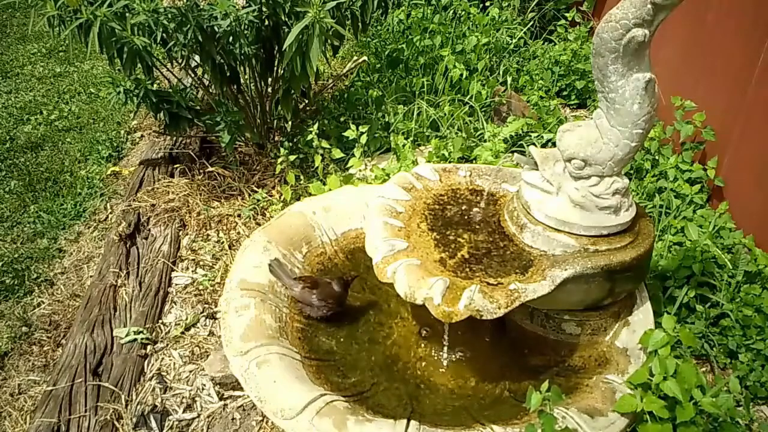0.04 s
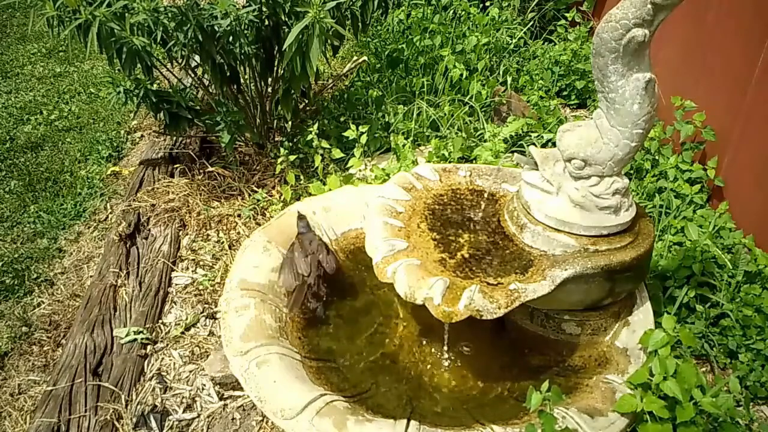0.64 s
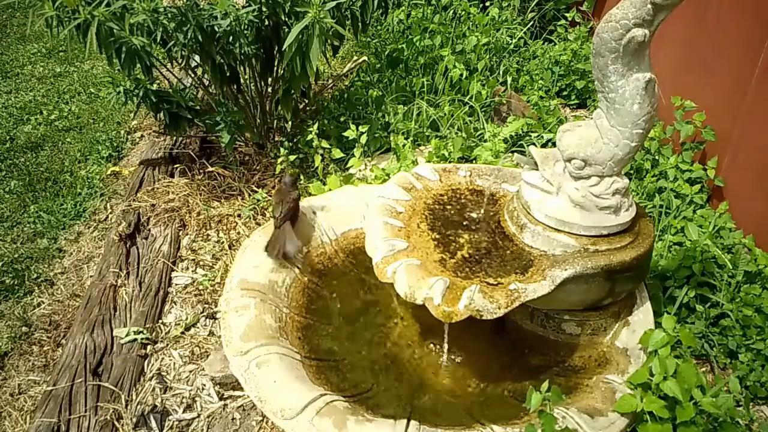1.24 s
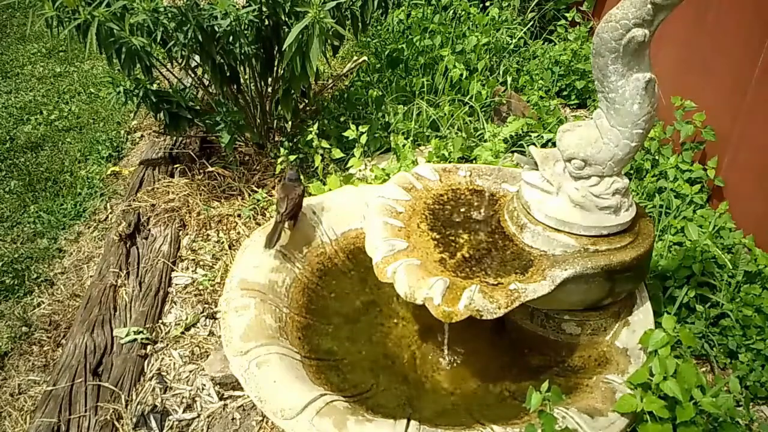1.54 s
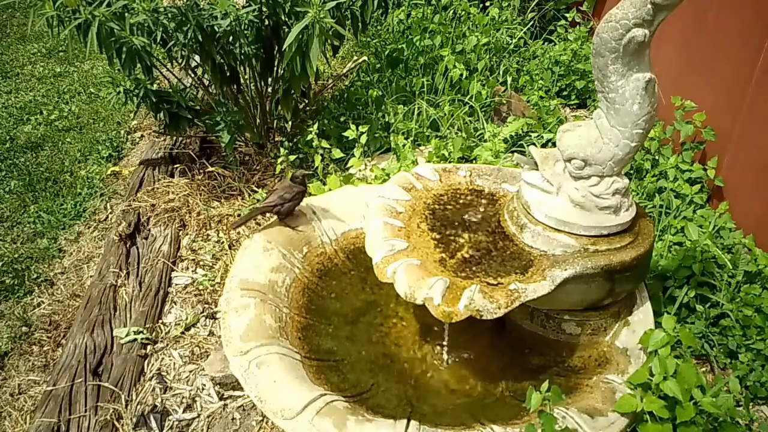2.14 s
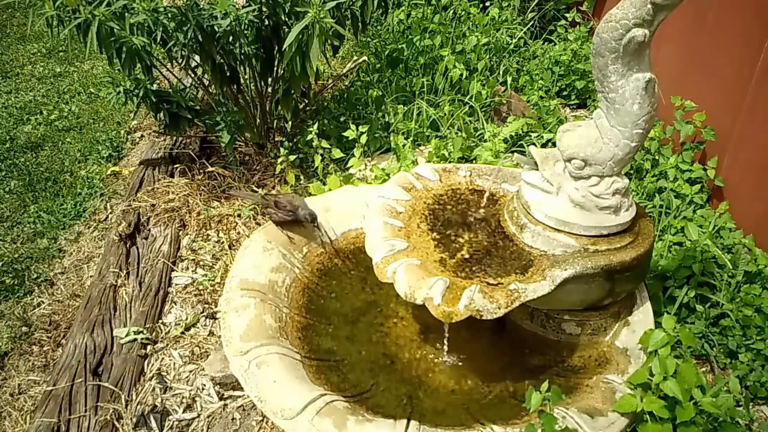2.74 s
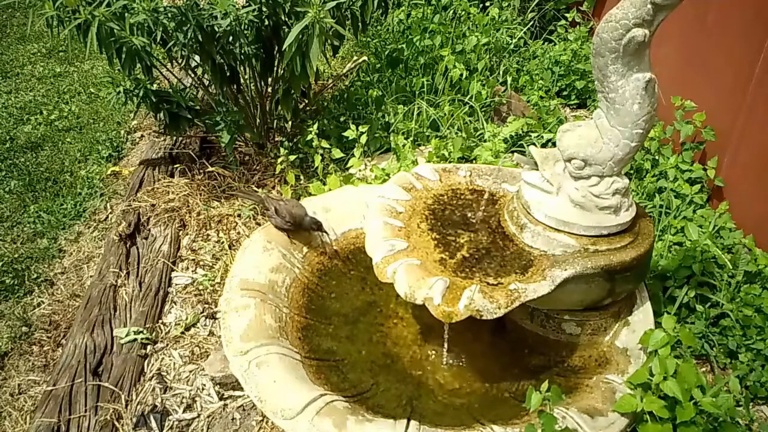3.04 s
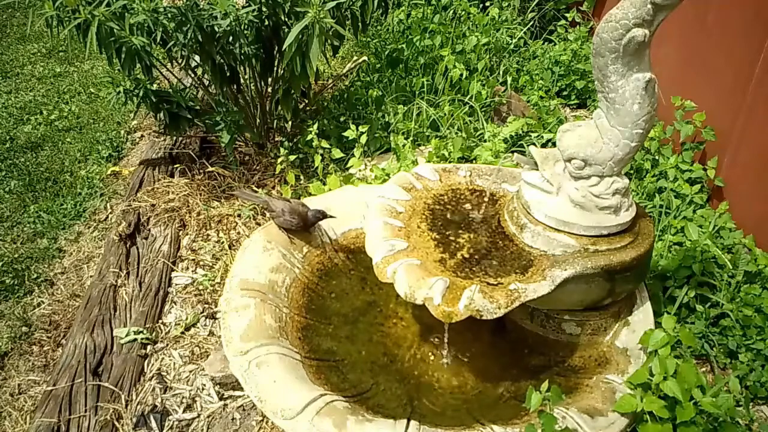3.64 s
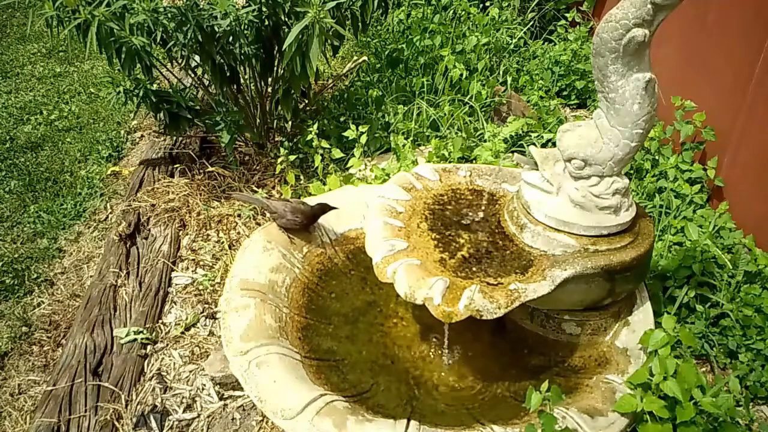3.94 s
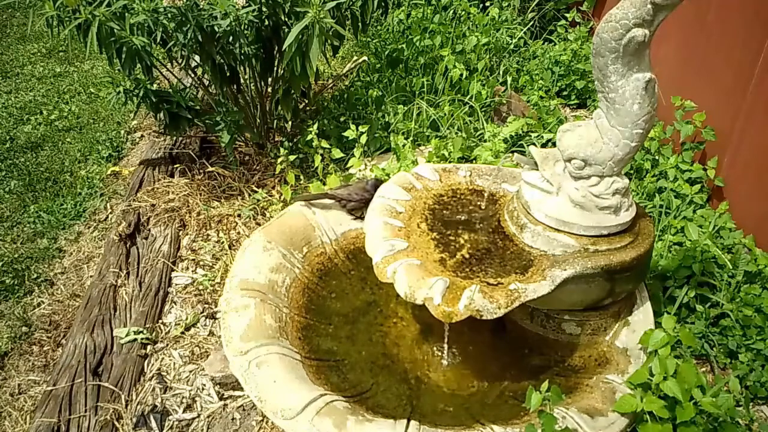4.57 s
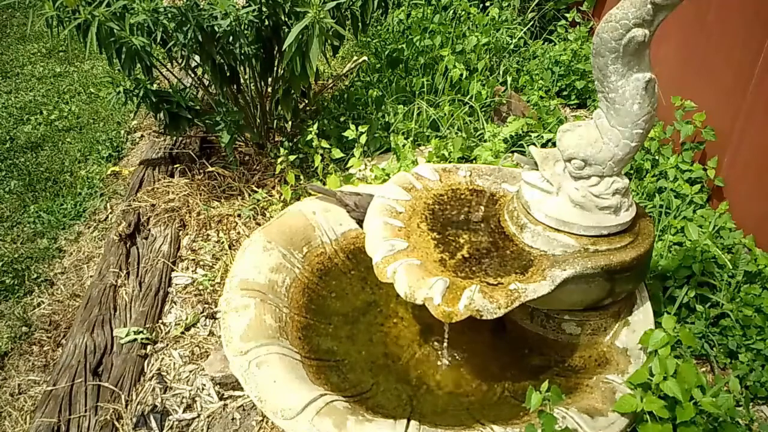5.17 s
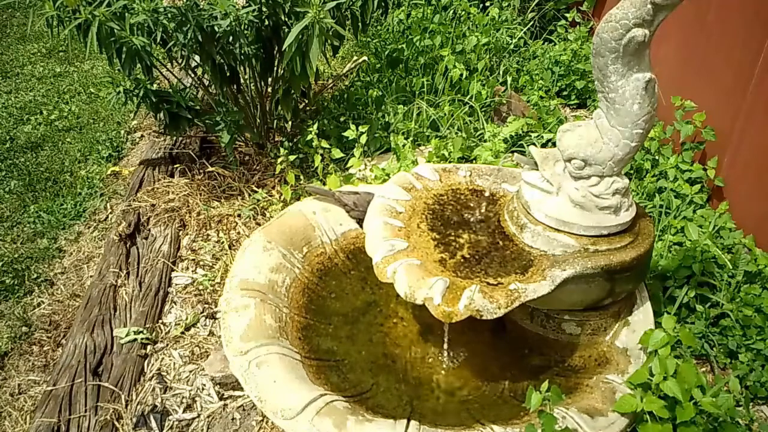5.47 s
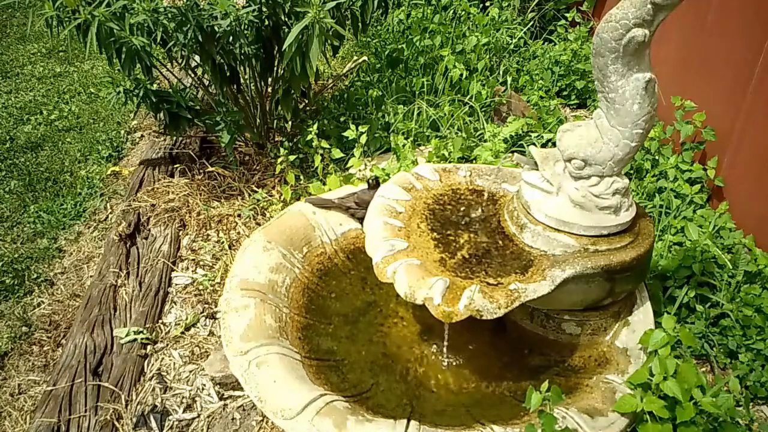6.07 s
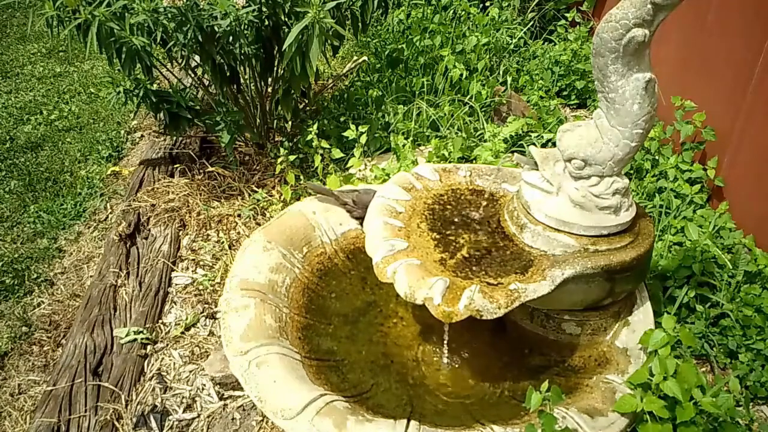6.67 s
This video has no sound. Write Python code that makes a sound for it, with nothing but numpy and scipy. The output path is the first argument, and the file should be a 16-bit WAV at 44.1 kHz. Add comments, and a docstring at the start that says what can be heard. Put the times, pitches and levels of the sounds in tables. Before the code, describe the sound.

Close water splashing and plinking steadily in a concrete fountain, joined midway by a distant songbird and then a nearer bird's rising whistles.

```python
"""A thin stream trickles from a concrete garden fountain's scalloped bowl into the shallow basin below.
Close to the microphone, drops slap the water and trap bubbles that ring and rise in pitch; fine spray
ticks on the concrete, and the hollow under the bowl rings along. A pump hums beneath it all.
Far off in the garden one songbird sings a run of falling slurs, then a nearer one gives long rising
whistles. Trees and walls return a soft echo; the microphone is mono."""
import sys
import numpy as np
from scipy import signal
from scipy.fft import rfft, irfft, next_fast_len
from scipy.io import wavfile
from scipy.ndimage import map_coordinates

SR = 44100
rng = np.random.default_rng(int(sys.argv[2]) if len(sys.argv) > 2 else 0)


def waveform_to_disk(signal):
    """Save audio, clipped to [-1, 1], as 16-bit WAV at the path in sys.argv[1]."""
    frames = np.transpose(np.atleast_2d(signal))
    scaled = np.clip(frames, -1, 1) * 32767
    samples = np.round(scaled).astype(np.int16)
    wavfile.write(sys.argv[1], SR, samples)


N = 300321

# Levels in the tables are relative: each layer's gain and colour come on top.
# hush of still air and distance: freq_hz, gain_db
HUSH_COLOUR = [(20, -10), (60, -4), (140, -1), (300, 1.5), (500, 6.5), (1000, -8), (3000, -45),
               (7000, -15.5), (11000, -17), (16000, -20)]
# echo among the trees and walls: freq_hz, t60_s
GARDEN_DECAY = [(500, 0.76), (3000, 0.58), (8000, 0.75)]
# puffs of air on the microphone: centre_s, level_db
AIR_PUFFS = [(0.46, -76), (1.55, -72)]
# their rumble: freq_hz, gain_db
PUFF_COLOUR = [(10, -20), (30, 5), (65, -3), (130, -25), (600, -80)]
# tones of the pump: pitch_hz, level_db
PUMP_TONES = [(58, -85), (104.9, -79.5), (118, -85.5), (209, -88), (412.3, -83.5)]
# slow swell of the hum, taken about its mean: time_s, level_db
HUM_SWELL = [(0.0, -83), (0.07, -84), (1.06, -77.5), (3.41, -86), (4.72, -79.5), (6.81, -81.5)]
# the far bird's closing flourish: start_s, length_s, first_hz, last_hz, level_db
FLOURISH = [(3.867, 0.078, 2837, 4135, -43), (3.917, 0.037, 5120, 4070, -45.5),
            (3.993, 0.094, 3004, 4040, -48), (4.131, 0.075, 3970, 3140, -51.5),
            (4.241, 0.063, 3590, 3190, -46)]
# the near bird's rising whistles: start_s, length_s, level_db
RISING_WHISTLES = [(4.703, 0.34, -45.5), (5.694, 0.38, -39)]
# one such whistle climbs, swells and sinks back a little: length_share, pitch_hz, level_db
RISING_CONTOUR = [(0, 1604, -12), (.27, 1880, -11), (.48, 2240, -4), (.57, 2750, -4), (.64, 3080, 2),
                  (.72, 3170, 5.5), (.79, 3090, -4), (.88, 2760, -6), (1, 2590, -7)]
# the near bird's soft notes: start_s, length_s, first_hz, middle_hz, last_hz, level_db
SOFT_NOTES = [(5.29, 0.12, 2980, 2590, 2620, -49), (5.465, 0.16, 2590, 2655, 2730, -52),
              (6.049, 0.203, 2670, 2580, 2670, -55), (6.318, 0.095, 2620, 2240, 1950, -47),
              (6.51, 0.078, 1780, 1753, 1660, -52), (6.607, 0.086, 2170, 2136, 2360, -52)]
# colour of the bowl and basin: freq_hz, gain_db
BASIN_COLOUR = [(100, -17), (400, -3.5), (650, -2), (950, 1.5), (1200, -2), (1450, 2), (2500, 3), (3400, 6),
                (4400, 9.5), (5400, 2), (6700, 9), (7600, 5), (9800, 3.5), (11200, -6.5), (16000, -60)]
# the loudest spray landing on concrete: start_s, level_db
SPRAY_TICKS = [(0.1546, -37), (0.627, -34), (0.7874, -33.5), (0.9068, -34), (0.959, -34), (0.985, -35),
               (1.053, -28), (1.1797, -49), (1.3015, -36), (1.4167, -34), (1.4752, -33), (1.5252, -36.5),
               (1.758, -26.5), (1.9604, -35.5), (2.1772, -37), (1.9849, -36), (2.1337, -36), (2.294, -33),
               (2.8374, -32), (3.3576, -34), (3.4301, -36), (3.5126, -36), (3.5242, -39), (3.7264, -35),
               (3.9225, -37), (4.1721, -33), (4.8272, -31), (5.0142, -33.5), (5.574, -32.5),
               (5.6825, -36.5), (5.7486, -33), (5.9202, -35.5), (5.982, -37), (6.1963, -35.5),
               (6.2496, -35.5), (6.316, -34), (6.3274, -40), (6.547, -31.5), (6.7424, -41)]
# moments when the stream breaks off: centre_s
STREAM_LULLS = [0.611, 1.3, 1.728, 1.795, 1.898, 2.69, 2.726, 2.825, 3.969, 4.547, 4.645, 5.055, 5.12, 5.22,
                5.499, 5.7, 5.74, 5.775, 6.03, 6.285]
# fizz where the stream lands: freq_hz, gain_db
FIZZ_COLOUR = [(400, -4), (650, -34), (900, 14), (1500, 15), (2500, 6), (3500, 11.5), (4400, 0.5),
               (5500, 1.5), (6700, -15.5), (10000, -10), (11500, -36)]
# bubbles that float up and swoop: start_s, length_s, first_hz, last_hz, level_db
FLOATING_BUBBLES = [(0.395, 0.017, 1490, 2920, -45), (1.37, 0.025, 922, 2910, -39),
                    (1.62, 0.018, 1390, 2620, -44), (1.919, .028, 990, 1900, -41),
                    (2.108, 0.032, 905, 1710, -47.5), (2.115, 0.016, 2450, 4120, -43),
                    (2.225, 0.057, 533, 1110, -45), (2.731, .03, 647, 1000, -53),
                    (3.137, 0.05, 550, 844, -51.5), (3.262, .027, 570, 950, -64),
                    (3.292, 0.022, 1010, 1750, -40), (3.71, 0.044, 587, 1250, -44),
                    (4.041, 0.021, 864, 2100, -45.5), (4.691, .02, 1900, 3270, -45),
                    (5.174, 0.024, 1290, 2620, -50), (6.052, 0.014, 1350, 3020, -43.5),
                    (6.3, .009, 2600, 3970, -43), (6.436, 0.017, 1440, 2950, -40),
                    (6.508, 0.021, 1325, 3430, -46), (6.612, 0.019, 580, 950, -44.5)]
# sharp smacks of drops hitting the water: start_s, level_db, centre_hz
SPLAT_DROPS = [(0.029, -38, 3600), (0.113, -33, 1400), (0.624, -32, 1750), (0.726, -29.5, 2640),
               (0.987, -31.5, 1440), (1.053, -30, 3500), (1.178, -33, 1630), (1.217, -29, 2370),
               (1.271, -29, 2570), (1.68, -36, 1980), (1.744, -29.5, 2200), (2.376, -33, 3460),
               (2.612, -32.5, 3230), (2.838, -31, 3360), (2.853, -25, 1920), (2.937, -33, 3350),
               (3.012, -33, 1450), (3.061, -33.5, 3580), (3.162, -32, 3060), (3.521, -42, 1460),
               (3.523, -31.5, 4050), (3.619, -34, 3500), (4.598, -29, 1510), (4.613, -29, 1320),
               (4.87, -30, 1500), (4.934, -32.5, 3480), (5.072, -29.5, 1630), (5.15, -31.5, 2040),
               (5.552, -29, 2700), (5.652, -29, 2030), (5.797, -35, 1440), (6.249, -51, 3320),
               (6.419, -32, 3600), (6.509, -34, 1440), (6.696, -21.5, 2780), (6.739, -37, 1500)]
# big bubbles glide most: pitch_hz, rise_share_per_life
BUBBLE_GLIDE = [(600, 0.182), (1500, 0.094), (3500, 0.07)]
# heavy drops, with low bubbles, slap hardest: pitch_hz, boost_db
SLAP_BOOST = [(800, 9), (1400, 0)]
# the loudest drops that trap a bubble: start_s, level_db, pitch_hz, life_cycles
RINGING_DROPS = [(0.029, -19.5, 1920, 1.9), (0.063, -36, 1980, 6.3), (0.132, -34, 1280, 4.4),
                 (0.141, -36.5, 607, 4.3), (0.184, -37, 563, 6.6), (0.214, -25, 1390, 2.1),
                 (0.224, -26.5, 1390, 5.3), (0.279, -38, 640, 4.8), (0.291, -25.5, 2630, 4.7),
                 (0.311, -23, 3400, 1.3), (0.313, -27.5, 2050, 3.5), (0.372, -32, 1540, 6.2),
                 (0.379, -21.5, 1940.0, 1.2), (0.414, -30, 1390, 1.8), (0.434, -33.5, 690, 7.3),
                 (0.447, -27, 1496, 5.6), (0.464, -19, 3100, 0.91), (0.516, -34, 694, 1.9),
                 (0.547, -37.5, 600, 7.7), (0.587, -37.5, 944, 8.8), (0.624, -33, 690, 3),
                 (0.65, -34.5, 610, 5.9), (0.669, -23, 2210, 1.9), (0.686, -31, 1390, 2),
                 (0.751, -34.5, 3380, 6.1), (0.787, -31, 2650, 5.7), (0.826, -33, 3030, 4.7),
                 (0.857, -35.5, 1550, 5.1), (0.875, -36, 3700, 5), (0.963, -24.5, 1450, 5.7),
                 (1.02, -35, 3220, 8.1), (1.077, -28.5, 3310, 6.7), (1.092, -37, 550, 4.1),
                 (1.092, -22.5, 1810, 1.1), (1.115, -35, 4300, 4.2), (1.144, -26.5, 1310, 3.9),
                 (1.146, -36, 615, 1.6), (1.245, -33, 1010, 6.6), (1.245, -22.5, 3400, 1.1),
                 (1.347, -24.5, 4180.0, 2.2), (1.365, -30, 920, 4.9), (1.368, -41, 540, 4.4),
                 (1.48, -38, 706, 3.4), (1.51, -23.5, 3200, 1.9), (1.523, -30, 2170, 3.2),
                 (1.659, -36, 1330, 4), (1.68, -25, 1490, 2.7), (1.688, -37, 677, 6.9),
                 (1.743, -40.0, 785, 5.2), (1.744, -24.5, 3600, 1.8), (1.751, -31, 1310, 3.5),
                 (1.755, -38, 462, 2.5), (1.803, -33.5, 3950, 10), (1.842, -27.5, 1390, 2.8),
                 (1.845, -36, 3530, 5.3), (1.881, -34.5, 3400, 5.6), (1.911, -28, 700, 4.6),
                 (1.926, -26.5, 1390, 1.4), (1.961, -27.5, 2050, 2.5), (1.985, -31.5, 613, 1.2),
                 (2.035, -35.5, 2590, 7), (2.08, -41, 630, 3.9), (2.091, -34, 2440, 5.3),
                 (2.228, -34.5, 522.0, 2.6), (2.278, -39, 566, 4.2), (2.279, -27.5, 1300, 1.6),
                 (2.293, -28, 3220, 6.6), (2.307, -32.5, 586, 4.6), (2.324, -25.5, 1615, 3.6),
                 (2.333, -54, 598, 4.8), (2.337, -25, 2050, 3.2), (2.388, -30, 1690, 3.1),
                 (2.456, -33, 1337, 2.6), (2.473, -29, 2390, 3.1), (2.519, -29, 1290, 5.9),
                 (2.55, -32.5, 924, 12), (2.582, -32.5, 935, 6.3), (2.593, -32, 2250, 4.1),
                 (2.622, -31.5, 3250, 11), (2.736, -29, 3450, 6.4), (2.747, -34.5, 1290, 5.3),
                 (2.765, -30.5, 1460, 2.4), (2.838, -27, 1930, 1.9), (2.856, -23.5, 854, 2),
                 (2.879, -35, 1320, 2.6), (2.951, -23.5, 3380, 1.9), (2.952, -29.5, 1540, 3.0),
                 (2.969, -31.5, 3780, 4.8), (2.987, -33, 1150, 3.9), (3.012, -31, 1560, 5.5),
                 (3.022, -24.5, 1350, 4.8), (3.027, -37, 647, 2.2), (3.115, -31, 1240, 5.1),
                 (3.2, -19, 3350, 0.81), (3.216, -24, 1230, 2), (3.252, -30, 2200, 5),
                 (3.293, -26.5, 1050, 1.4), (3.359, -48, 680.0, 8), (3.359, -20.5, 3740, 0.91),
                 (3.516, -33.5, 2080, 7), (3.545, -38, 660, 5.2), (3.582, -24, 1550, 3.0),
                 (3.583, -34.5, 560, 5), (3.628, -31.5, 3230, 7.9), (3.634, -24, 1330, 0.79),
                 (3.683, -30.5, 1275, 4.5), (3.707, -23.5, 2800, 2.3), (3.716, -39, 565, 2.6),
                 (3.752, -31, 970, 2.9), (3.772, -24, 1770, 3.8), (3.771, -31.5, 657, 3.8),
                 (3.798, -28, 2600, 3.5), (3.83, -32, 1410, 2.3), (3.907, -25.5, 3390, 2.7),
                 (3.929, -23, 2100, 1.1), (4.015, -37.5, 690, 14), (4.105, -34, 720, 5.5),
                 (4.106, -30.5, 1890, 7.2), (4.13, -32.5, 677, 4.8), (4.143, -37, 2150, 3),
                 (4.171, -42, 660, 1.9), (4.198, -37, 1410, 4.4), (4.243, -31.5, 670, 3.3),
                 (4.374, -22.5, 3010, 4.9), (4.397, -25.5, 1330, 1.6), (4.43, -33, 3750, 7.1),
                 (4.512, -33, 2400, 5), (4.561, -36.5, 690, 3.6), (4.616, -28, 1150, 4.2),
                 (4.668, -28, 3200, 5.5), (4.678, -36, 504, 3.9), (4.678, -6.5, 2360, 0.89),
                 (4.792, -31.5, 3540, 5.4), (4.807, -32, 1320, 3.5), (4.872, -30.5, 1340, 4.1),
                 (4.921, -33, 675, 4), (4.951, -23.5, 3400, 1.2), (4.955, -27.5, 1170, 1.8),
                 (4.968, -34, 1130, 5.2), (4.97, -31, 3520, 6.7), (4.995, -30, 1320, 2.4),
                 (5.191, -25.5, 1840, 2.8), (5.198, -37, 545, 5.6), (5.233, -34, 3180, 9.2),
                 (5.235, -40, 684, 2.7), (5.288, -32, 1007, 6.3), (5.298, -35, 3510, 9),
                 (5.325, -32, 753, 4.9), (5.379, -20.5, 3830, 6.6), (5.53, -32.5, 443, 2.5),
                 (5.581, -25, 3070, 2), (5.607, -30, 2080, 3.3), (5.621, -34, 3460, 5.4),
                 (5.652, -30, 2340, 2.7), (5.659, -39, 970, 6.6), (5.663, -27, 1740, 5.6),
                 (5.798, -30.5, 1260, 2.9), (5.808, -32, 3660, 4.7), (5.821, -25, 2680, 1.1),
                 (5.83, -20.5, 3240, 6), (5.88, -29.5, 3120, 5.8), (5.901, -39, 571, 8.3),
                 (5.927, -31, 1950, 7.5), (5.939, -32.5, 690, 2.8), (5.944, -38, 1293, 4.2),
                 (5.956, -24.5, 1430, 1.4), (5.981, -23.5, 1900, 1.8), (6.01, -21.5, 3060, 3.1),
                 (6.101, -34, 3280, 5.2), (6.171, -27, 1420, 2.3), (6.197, -30.5, 3340, 6.7),
                 (6.208, -30, 2080, 5.5), (6.249, -33, 3170, 8.9), (6.379, -43, 592, 4.3),
                 (6.466, -24.0, 1700, 4.5), (6.511, -37, 632, 3), (6.547, -31, 3620, 5),
                 (6.585, -30.5, 1093, 4.2), (6.615, -36, 604, 1.5), (6.688, -35, 543, 2.7),
                 (6.693, -17.5, 2590, 3.4), (6.715, -32.5, 3160, 11), (6.739, -35, 548, 3.5)]


def amp(db):
    """Decibels to gain."""
    return 10 ** (np.asarray(db) / 20)


def unit(x):
    """Scale to rms 1."""
    return x / np.sqrt(np.mean(x ** 2) + 1e-20)


def along(points, hz):
    """Read (freq_hz, value) points on a log frequency axis."""
    freqs, values = np.transpose(points)
    return np.interp(np.log(hz + 1), np.log(freqs + 1), values)


def wobble(rate_hz, size=N):
    """A smooth random curve with rate_hz knots a second."""
    knots = rng.standard_normal(int(N * rate_hz / SR) + 4)
    return map_coordinates(knots, [np.arange(size) * rate_hz / SR])


def add(track, start_s, sound):
    """Mix a sound into the track from start_s."""
    start = int(np.clip(round(start_s * SR), 0, N - 1))
    track[start:start + len(sound)] += sound[:N - start]


def coloured(x, points, size=4096):
    """Minimum-phase filter through (freq_hz, gain_db) points."""
    gain = amp(along(points, np.fft.rfftfreq(size, 1 / SR)))
    cepstrum = irfft(np.log(gain))
    cepstrum[1:size // 2] *= 2
    cepstrum[size // 2 + 1:] = 0
    return signal.fftconvolve(x, irfft(np.exp(rfft(cepstrum))))[:N]


def noise(points):
    """Coloured noise of rms 1."""
    return unit(coloured(rng.standard_normal(N), points))


def garden_echo(x):
    """Trees and walls answer diffusely, each frequency dying at its own speed."""
    hz, t, spectrum = signal.stft(rng.standard_normal(SR), SR, nperseg=256)
    decay = amp(-60 * t / along(GARDEN_DECAY, hz)[:, None])
    tail = signal.istft(spectrum * decay, SR, nperseg=256)[1]
    return signal.fftconvolve(x, tail / np.linalg.norm(tail))[:N]


def garden_air(hush_db=-68, calm_db=-86, puff_s=0.08):
    """The distant hush of the garden, and puffs of air rumbling on the microphone."""
    t = np.arange(N) / SR
    puffs = sum(amp(db) * np.exp(-((t - s) / puff_s) ** 2) for s, db in AIR_PUFFS)
    rumble = (amp(calm_db) + puffs) * noise(PUFF_COLOUR)
    return rumble + amp(hush_db) * noise(HUSH_COLOUR)


def pump():
    """The fountain's pump hums faintly: low tones that waver in phase and swell together."""
    t = np.arange(N) / SR
    swell_db = np.interp(t, *np.transpose(HUM_SWELL))
    hum = sum(amp(db) * np.sin(2 * np.pi * hz * t + 0.5 * wobble(9.6)) for hz, db in PUMP_TONES)
    return np.sqrt(2) * amp(swell_db - swell_db.mean()) * hum


def whistle(length_s, contour, waver, fade_s):
    """A bird's slightly unsteady tone along (length_share, pitch_hz, level_db) points."""
    share, hz, db = np.transpose(contour)
    progress = np.linspace(0, 1, int(length_s * SR))
    pitch = np.interp(progress, share, hz) * (1 + waver * wobble(160, size=len(progress)))
    fade = np.clip(np.minimum(progress, 1 - progress) * length_s / fade_s, 0, 1)
    envelope = fade * amp(np.interp(progress, share, db))
    return np.sqrt(2) * envelope * np.sin(2 * np.pi * np.cumsum(pitch) / SR)


def far_bird(start_s=2.928, period_s=0.115, slur_s=0.092, from_hz=5100, to_hz=2610, direct_db=-10):
    """Far down the garden, more echo than bird: a swelling run of falling slurs, then a flourish."""
    run = []
    for k, to_go in enumerate(np.linspace(1, 0, 8)):
        first_hz = from_hz * (1 + 0.03 * rng.standard_normal())
        run.append((start_s + k * period_s, slur_s, first_hz, to_hz, -46.5 - 7 * to_go ** 2))
    out = np.zeros(N)
    for s, length_s, first_hz, last_hz, db in [*run, *FLOURISH]:
        contour = [(0, first_hz, db), (0.5, np.sqrt(first_hz * last_hz), db), (1, last_hz, db)]
        slur = whistle(length_s, contour, waver=0.05, fade_s=0.022)
        add(out, s, amp(direct_db) * slur)
        add(out, s, garden_echo(slur))
    return out


def near_bird(direct_db=-5, echo_db=-7):
    """Nearer and drier: two rising whistles, each followed by soft notes bent along a parabola."""
    song = np.zeros(N)
    for s, length_s, db in RISING_WHISTLES:
        add(song, s, amp(db) * whistle(length_s, RISING_CONTOUR, waver=0.007, fade_s=0.012))
    for s, length_s, first_hz, middle_hz, last_hz, db in SOFT_NOTES:
        bend = np.polyfit([0, 0.5, 1], [first_hz, middle_hz, last_hz], 2)
        contour = [(share, np.polyval(bend, share), db) for share in np.linspace(0, 1, 10)]
        add(song, s, whistle(length_s, contour, waver=0.015, fade_s=0.025))
    return amp(direct_db) * song + amp(echo_db) * garden_echo(song)


def scattered(sound, echo_db, decay_s):
    """Each spot in the basin has its own cluster of reflections from the rim and the bowl."""
    t = np.arange(SR // 25) / SR
    walls = rng.standard_normal(len(t)) * np.exp(-t / decay_s) * (t > 0.001)
    path = amp(echo_db) * walls / np.linalg.norm(walls)
    path[0] = 1  # straight to the microphone
    return signal.fftconvolve(sound, path)


def hollow(x, ring_hz=652, width_hz=140):
    """The air between bowl and water rings briefly at every splash."""
    return signal.lfilter(*signal.iirpeak(ring_hz, ring_hz / width_hz, SR), x)


def bowl_reflection(x, comb_hz=700):
    """The bowl's underside returns the splash; added to it, this lifts every multiple of comb_hz."""
    samples = np.arange(N)
    return np.interp(samples - SR / comb_hz, samples, x)


def dripping(count, top_db, range_db):
    """A steady drip, one drop somewhere in each equal stretch of time: start_s, level_db."""
    offset, weakness = rng.random((count, 2)).T
    start_s = (np.arange(count) + offset) / count * N / SR
    return np.column_stack([start_s, top_db - range_db * weakness])


def smack(low_hz, high_hz, decay_s=0.0007, size=512):
    """The brief noisy burst of a drop breaking, energy 1."""
    hz = np.fft.rfftfreq(size, 1 / SR)
    highpass = (1j * hz / (low_hz + 1j * hz)) ** 2
    lowpass = 1 / (1 - (hz / high_hz) ** 2 + 1j * hz / high_hz) ** 2
    impact = rng.standard_normal(size) * np.exp(-np.arange(size) / (SR * decay_s))
    burst = irfft(highpass * lowpass * rfft(impact))
    return burst / np.linalg.norm(burst)


def bubble(hz, cycles, rise, onset_lives=0.59):
    """A trapped bubble rings down, its pitch climbing as it nears the surface."""
    life_s = max(cycles, 0.5) / hz
    age = np.arange(int(6 * life_s * SR)) / (life_s * SR)  # in lives
    pitch = hz * (1 + rise * np.minimum(age, 3))
    envelope = np.exp(-age) * (1 - np.exp(-age / onset_lives))
    return envelope * np.sin(2 * np.pi * np.cumsum(pitch) / SR)


def swarm(per_second, low_hz, high_hz, cycles, rise, spread_db):
    """Many small bubbles of random size and moment, rms 1; most die at once, a few ring on."""
    out = np.zeros(N)
    for when, smallness, loudness, life, climb in rng.random((int(per_second * N / SR), 5)):
        hz = low_hz * (high_hz / low_hz) ** smallness
        ring = bubble(hz, cycles * (0.45 + 1.4 * life ** 2), 2 * rise * climb, onset_lives=0.5)
        add(out, when * N / SR, amp(spread_db * loudness ** 2) * ring)
    return unit(out)


def spray(tick_gain_db=2.5, mist_db=-74):
    """Droplets tick on the wet concrete, with a mist of finer ones between."""
    ticks = np.zeros(N)
    for s, db in [*SPRAY_TICKS, *dripping(count=50, top_db=-43.5, range_db=0)]:
        tick = smack(low_hz=6640, high_hz=6330)
        add(ticks, s, amp(db + tick_gain_db) * scattered(tick, echo_db=-4, decay_s=0.0023))
    mist = swarm(per_second=90, low_hz=5500, high_hz=9000, cycles=1.5, rise=0, spread_db=18)
    return ticks + amp(mist_db) * mist


def flow(pinch_db=-1, lead_s=0.0088, pinch_s=0.003, lull_db=-5.5, lull_s=0.014):
    """Strength of the stream: it thins just ahead of each big drop and now and then breaks off."""
    t = np.arange(N) / SR
    starts = np.array([row[0] for row in RINGING_DROPS])
    next_drop = np.minimum(np.searchsorted(starts, t), len(starts) - 1)
    wait_s = starts[next_drop] - t
    pinch = np.exp(-((wait_s - lead_s) / pinch_s) ** 2)
    lull = sum(np.exp(-((t - s) / lull_s) ** 2) for s in STREAM_LULLS)
    return amp(pinch_db * pinch + lull_db * lull)


def stirring(heavy_below_hz=1300, rest_db=-1, settle_s=0.015):
    """Each heavy drop, one with a low bubble, stirs up the water, which then settles; rms 1."""
    kicks = np.zeros(N)
    for s, _, hz, _ in RINGING_DROPS:
        if hz < heavy_below_hz:
            add(kicks, s, np.ones(1))
    settling = signal.lfilter([1], [1, -np.exp(-1 / (settle_s * SR))], kicks)
    return unit(amp(rest_db) + settling)


def churn(gurgle_db=-59, tinkle_db=-54, fizz_db=-59, flutter_db=3, surge_db=2):
    """Where the stream lands: low gurgles, a tinkle of small bubbles and a fluttering fizz."""
    gurgle = swarm(per_second=80, low_hz=540, high_hz=800, cycles=6, rise=0.06, spread_db=7)
    tinkle = swarm(per_second=210, low_hz=950, high_hz=4000, cycles=3, rise=0.07, spread_db=14)
    fizz = noise(FIZZ_COLOUR) * amp(flutter_db * wobble(70))
    surge = unit(amp(surge_db * wobble(40)))  # the stream breaks into uneven beads
    return amp(gurgle_db) * stirring() * gurgle + surge * (amp(tinkle_db) * tinkle + amp(fizz_db) * fizz)


def patter(centre_hz=2750, log_spread=0.39):
    """Small sharp drops patter on the water between the loud ones."""
    out = np.zeros(N)
    for s, db in dripping(count=95, top_db=-28, range_db=9):
        hz = centre_hz * np.exp(log_spread * rng.standard_normal())
        add(out, s, amp(db) * scattered(smack(0.6 * hz, hz), echo_db=-5, decay_s=0.0025))
    return out


def random_drops(count, top_db, range_db, low_hz, high_hz, cycles):
    """Drops with bubbles of random size and life: start_s, level_db, pitch_hz, life_cycles."""
    smallness, life = rng.random((count, 2)).T
    pitch_hz = low_hz * (high_hz / low_hz) ** smallness
    return np.column_stack([dripping(count, top_db, range_db), pitch_hz, cycles * (0.5 + life)])


def soft_drops():
    """Softer drops land as low plops and high plinks."""
    plops = random_drops(count=14, top_db=-43, range_db=9, low_hz=483, high_hz=760, cycles=2.1)
    plinks = random_drops(count=40, top_db=-35, range_db=5, low_hz=1400, high_hz=4000, cycles=4)
    return ringing_drops(plops, slap_db=15) + ringing_drops(plinks, slap_db=0)


def bloops(curve=1.44):
    """A bubble floating to the surface swells and swoops upward ever faster."""
    out = np.zeros(N)
    for s, length_s, first_hz, last_hz, db in FLOATING_BUBBLES:
        progress = np.linspace(0, 1, int(length_s * SR))
        pitch = first_hz * (last_hz / first_hz) ** (progress ** curve)
        swell = np.sin(np.pi * progress ** 0.76)  # loudest before the middle
        tone = swell * np.sin(2 * np.pi * np.cumsum(pitch) / SR)
        add(out, s, amp(db) * scattered(tone, echo_db=-6.5, decay_s=0.0056))
    return out


def splats(gain_db=7):
    """Drops hit the water with a sharp smack, some alone, some together with a ringing bubble."""
    out = np.zeros(N)
    for s, db, hz in SPLAT_DROPS:
        add(out, s, amp(db + gain_db) * scattered(smack(0.61 * hz, hz), echo_db=1, decay_s=0.0031))
    return out


def ringing_drops(rows, slap_db, open_from_db=-14.5, open_range_db=11, open_cut_db=-10.5):
    """Close to the microphone, each drop slaps the surface and traps a bubble that rings."""
    out = np.zeros(N)
    for s, db, hz, cycles in rows:
        # the very loudest fall clean into open water, with less slap and reflection
        open_db = open_cut_db * np.clip((db - open_from_db) / open_range_db, 0, 1)
        slap = smack(low_hz=520, high_hz=3010, decay_s=0.001)
        slap_gain = amp(db + slap_db + open_db + along(SLAP_BOOST, hz))
        ring = bubble(hz, cycles, rise=along(BUBBLE_GLIDE, hz))
        add(out, s, amp(db) * scattered(ring, echo_db=open_db - 5.5, decay_s=0.0041))
        add(out, s, slap_gain * scattered(slap, echo_db=open_db, decay_s=0.0031))
    return out


def scene(hollow_db=-3, bowl_db=-19, garden_db=-17):
    """The microphone stands at the basin: the fountain in front, the birds and the garden behind."""
    splashes = ringing_drops(RINGING_DROPS, slap_db=-2.36) + bloops() + splats()
    trickle = flow() * (soft_drops() + patter() + churn())
    water = coloured(splashes + trickle + spray(), BASIN_COLOUR)
    water += amp(hollow_db) * hollow(water)
    water += amp(bowl_db) * bowl_reflection(water)
    water += amp(garden_db) * garden_echo(water)
    return (water + near_bird() + far_bird() + pump() + garden_air())[None]


def record(dry, notch_hz=5500, notch_width_hz=200, top_hz=15900):
    """The camera has one narrow notch in the treble and keeps nothing above top_hz."""
    size = next_fast_len(N + SR // 2)
    hz = np.fft.rfftfreq(size, 1 / SR)
    detuning = notch_hz ** 2 - hz ** 2
    notch = detuning / (detuning + 1j * hz * notch_width_hz)
    return irfft(rfft(dry, size) * notch * (hz < top_hz), size)[..., :N]


dry = scene()
out = record(dry)
waveform_to_disk(out)
```